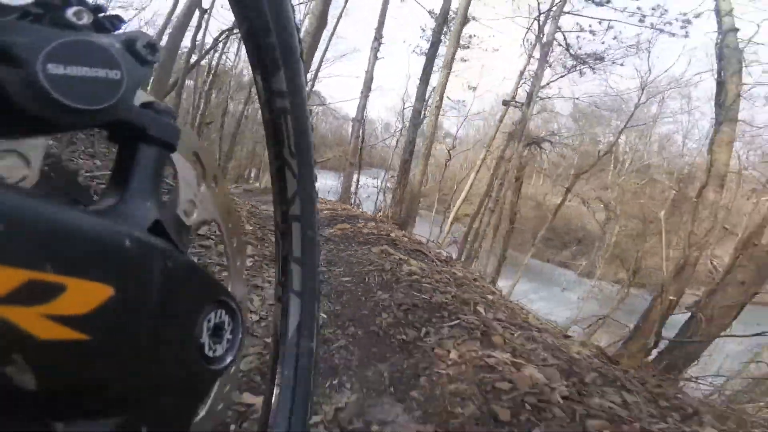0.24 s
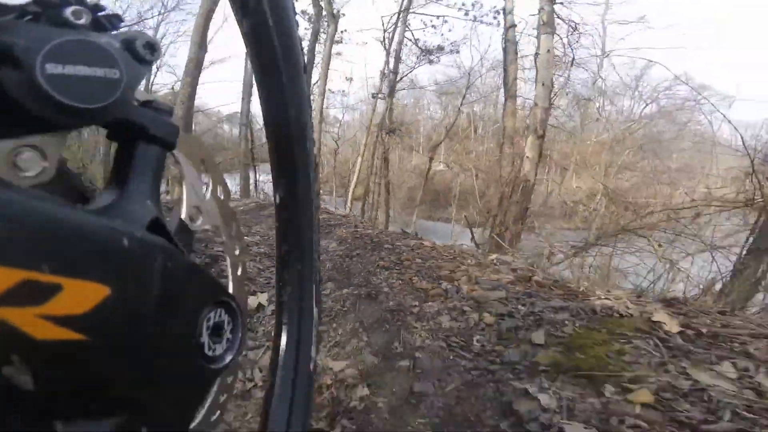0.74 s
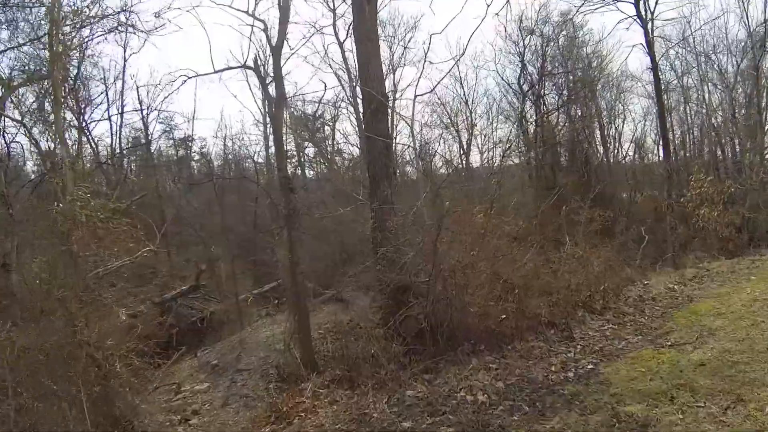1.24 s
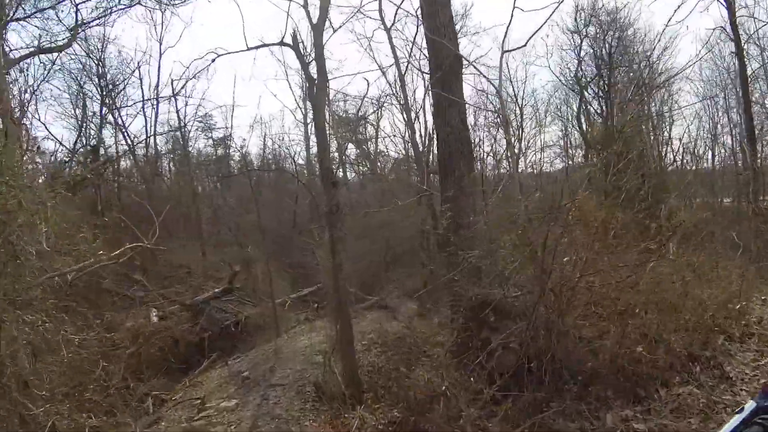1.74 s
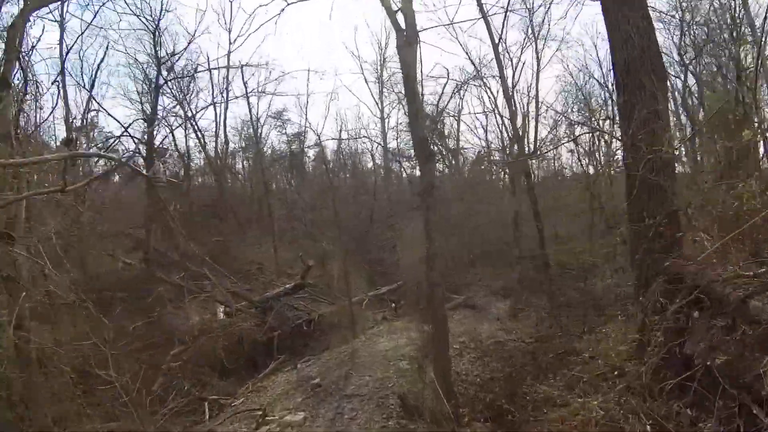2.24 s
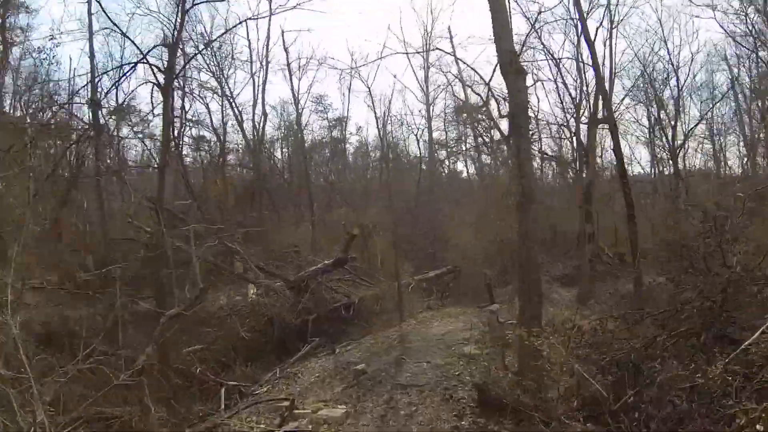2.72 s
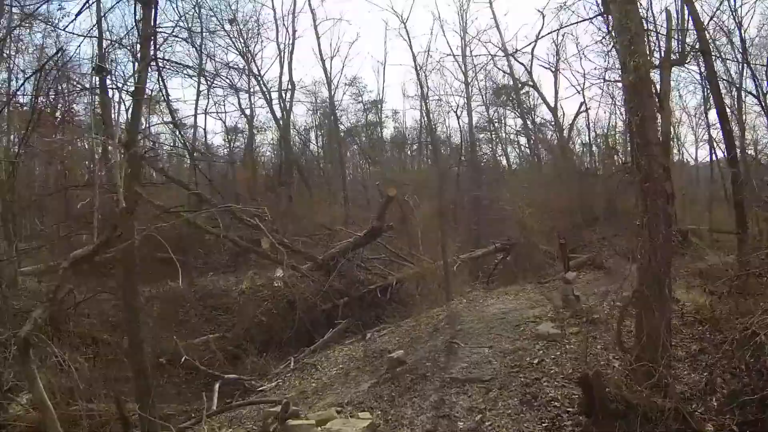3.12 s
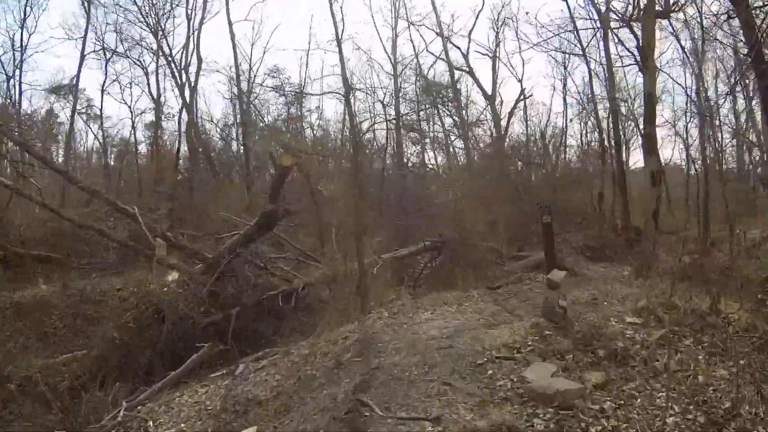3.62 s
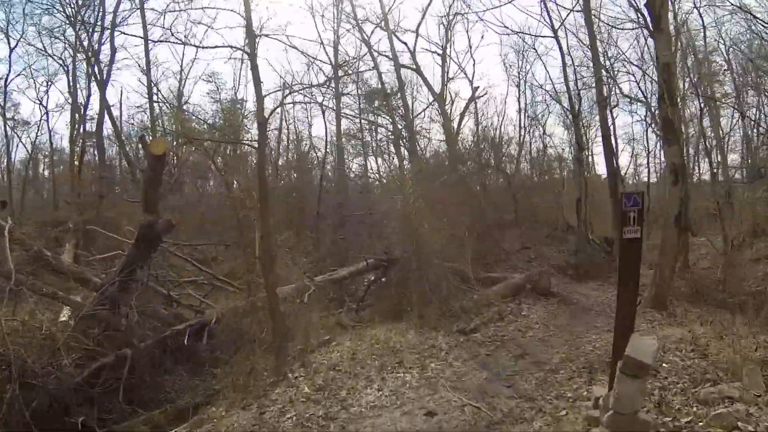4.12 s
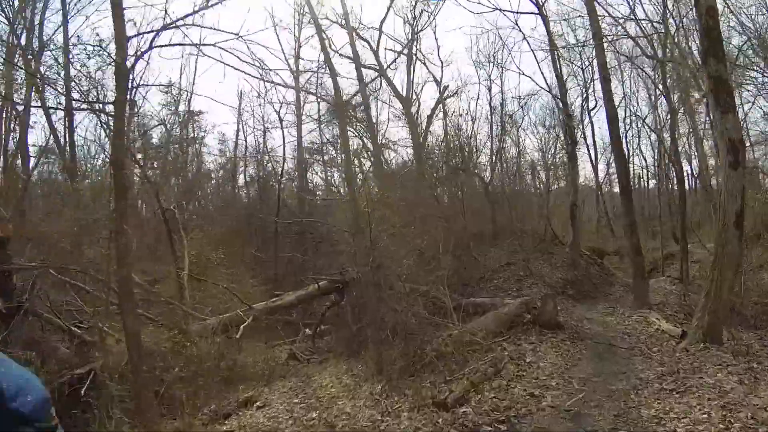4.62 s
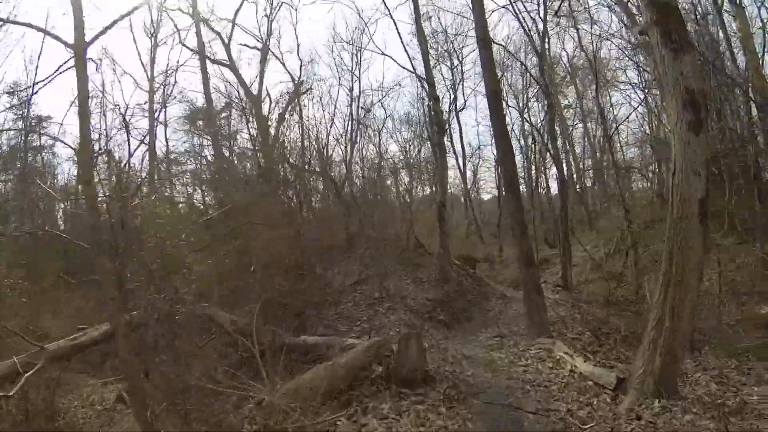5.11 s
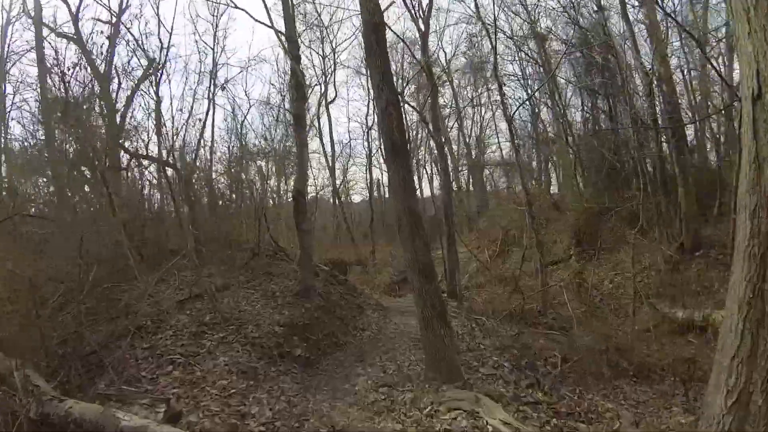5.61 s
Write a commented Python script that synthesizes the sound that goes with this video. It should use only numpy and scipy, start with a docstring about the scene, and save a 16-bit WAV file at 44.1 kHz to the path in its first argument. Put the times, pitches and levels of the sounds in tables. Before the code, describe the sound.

A mountain bike shakes over a dirt trail, heard from a closed case on its fork: booming tyre and frame, gritty rattles and sharp knocks that ring the brake disc. After about a second the sound cuts to a microphone on the rider, quieter at first. Wind rumble builds as tyres crunch leaves, twigs snap and bumps thud. The freewheel ticks while the bike coasts, the tyres hum briefly, and everything eases near the end.

```python
"""A mountain bike on a leafy dirt trail, heard first from a camera in a closed case on the fork:
the mount shakes, tyre and frame boom, grit rattles, and roots knock the parts and ring the brake disc.
At 1.2 s the sound cuts to a camera on the rider. Wind buffets the microphone, the body thrums, tyres
crunch leaves, twigs snap and bumps thud. From about 2 to 5 s the freewheel ticks as the bike coasts,
and around 3 s the tyre knobs hum briefly on hard ground, ending in a ringing bump."""
import sys
import numpy as np
from scipy import signal
from scipy.fft import rfft, irfft
from scipy.io import wavfile
from scipy.ndimage import uniform_filter1d

SR = 44100
rng = np.random.default_rng(int(sys.argv[2]) if len(sys.argv) > 2 else 0)


def digitize_waveform(pressure):
    """Quantize a signal to 16-bit integers and store it at the path in sys.argv[1].

    Rows of a 2-D input are taken as channels; values are limited to [-1, 1].
    """
    field = np.atleast_2d(pressure).T
    bounded = np.clip(field, -1, 1)
    quanta = np.round(bounded * 32767).astype(np.int16)
    wavfile.write(sys.argv[1], SR, quanta)


N = 258426
T = np.arange(N) / SR

# Table levels are relative. A mode is a note that a part rings at; t60 is its time to fade by 60 dB. Knocks
# over roots: t/s, crack/dB, boom/dB, rim/dB, treble/dB, disc/dB, pitch factor of the boom notes, boost of the
# top boom note/dB, pad/dB
KNOCKS = [(0.074, -34, -20, -50, -26, -44, 1.01, -2, -31),
          (0.192, -18, -15, -37, -46, -37.5, 0.99, -0.5, -40),
          (0.31, -28.5, -17.5, -40, -19.5, -39, 1.01, -4, -40),
          (0.39, -25, -28, -28, -39, -50, 1.01, 1, -42), (0.398, -26, -21, -21, -16.5, -50, 0.83, 3, -42),
          (0.429, -14, -15, -20, -39, -40, 1.01, 2, -42),
          (0.446, -41, -13.5, -10.5, -40, -53, 1.01, 0.5, -40),
          (0.457, -43, -19, -30, -24, -48, 1.03, -7, -40), (0.535, -4, -9, -8, -36, -55, 1.014, -1, -15),
          (0.554, -44, -11.5, -23, -11.5, -27, 1.02, 5.5, -22),
          (0.644, -5, -10.5, -10.5, -6.5, -30.5, .96, 4.5, -33),
          (0.659, -21.5, -7.5, -22, -23, -35, 0.98, 0, -35),
          (0.794, -19, -32, -21.5, -59, -56, 1.01, -6, -50),
          (0.814, -55, -13, -45, -60, -62, 1.01, -8, -59),
          (0.826, -33, -16.5, -42, -55, -53, 1.104, -4, -39),
          (0.93, -32.5, -35, -32, -53, -62, 1.24, 4, -47), (0.957, -38, -36, -40, -30, -60, 1.01, 6, -20.5),
          (1.032, -43, -37, -32, -54, -68, 1.4, 3, -55), (1.108, -70, -45, -33, -37, -65, 1.01, -5, -39),
          (1.173, -51.5, -32, -43, -33, -57, 1.01, 8, -44)]
# Modes of fork and wheel: f/Hz, level/dB, t60/s
FRAME_MODES = [(175.2, 4.5, 0.16), (209, -5.5, 0.17), (263.5, 4.5, 0.11), (431, -5.5, 0.043),
               (503, -5, 0.22), (1246, -9, 0.011), (1605, -13.5, 0.014), (1900, -13, 0.019)]
BOOM_MODES, RIM_MODES, CLACK_MODES = FRAME_MODES[:3], FRAME_MODES[3:5], FRAME_MODES[5:8]
# Modes of the brake pad grazing the disc: f/Hz, level/dB, t60/s
PAD_MODES = [(6490, -11.5, 0.016), (6900, -20, 0.015)]
# What the closed case lets through: f/Hz, level/dB
CASE_TONE = [(600, -1), (760, -8.5), (1000, -8), (1210, 0.5), (1680, -11), (1940, -7), (2590, -17),
             (4110, -20.5), (5420, -11.5), (6500, -16), (7500, -25), (9550, -30.5), (11300, -36.5),
             (12300, -52), (14000, -73)]
# What the rider's body passes on: f/Hz, level/dB
BODY_TONE = [(70, -39.5), (120, -2.5), (210, -7), (258, 2), (333, -6.5), (430, -12), (530, -16), (620, -20),
             (750, -19.5), (1100, -48)]
# The tone of crushed leaves: f/Hz, level/dB
LEAF_TONE = [(1290, -15), (2200, 2.5), (2500, 0.5), (3000, 5), (3690, 5.5), (4300, 4), (5500, 6.5),
             (6480, 3.5), (7510, -6), (9140, 1), (9920, -4.5), (12900, -7.5), (13900, -6.5), (15600, -37)]


def undb(db):
    """Turn decibels into a gain."""
    return 10 ** (np.asarray(db) / 20)


def unit(x):
    """Scale to an average (rms) level of 1."""
    return x / np.sqrt(np.mean(x ** 2))


def add(out, at, x):
    """Mix x into out, starting `at` seconds in."""
    i = int(at * SR)
    out[i:i + len(x)] += x[:N - i]


def colour(x, tone):
    """Filter x to the shape of a tone curve (f/Hz, level/dB); white noise keeps its power."""
    size = 1 << 13
    hz, db = np.transpose(tone)
    log_gain = np.interp(np.log(np.fft.rfftfreq(size, 1 / SR) + 1), np.log(hz), db) * np.log(10) / 20
    cepstrum = irfft(log_gain)
    # folding the second half onto the first keeps the filter from sounding before its input
    cepstrum[1:size // 2] *= 2
    cepstrum[size // 2 + 1:] = 0
    response = irfft(np.exp(rfft(cepstrum)))
    return signal.fftconvolve(x, response / np.linalg.norm(response))[:N]


def ring(x, modes):
    """Let x shake a part that rings at these modes (f/Hz, level/dB, t60/s)."""
    out = 0
    for hz, db, t60 in modes:
        pole = np.exp(2j * np.pi * hz / SR - np.log(1000) / (t60 * SR))
        out = out + undb(db) * np.sqrt(1 - abs(pole) ** 2) * signal.lfilter([1], [1, -pole], x).imag
    return out


def wander(per_s):
    """A curve that glides to a new random value per_s times a second."""
    step = int(SR / per_s)
    held = np.repeat(rng.standard_normal(N // step + 1), step)
    return unit(uniform_filter1d(held, step)[:N])


def grains(scatter_db, flutter_db, bunches_per_s):
    """Rough noise: tiny clicks of uneven size that come in bunches."""
    sizes = np.minimum(rng.exponential(size=N), 7)
    return unit(undb(scatter_db * sizes + flutter_db * wander(bunches_per_s)) * rng.standard_normal(N))


def strikes(times, db):
    """One sharp click at each time."""
    out = np.zeros(N)
    np.add.at(out, (np.asarray(times) * SR).astype(int), undb(db))
    return out


def bursts(times, db, t60, rise_s=0.00018):
    """Noise that rises fast and dies away at each time."""
    fades = signal.lfilter([1], [1, -np.exp(-np.log(1000) / (t60 * SR))], strikes(times, db))
    return uniform_filter1d(fades, size=max(int(rise_s * SR), 1)) * rng.standard_normal(N)


def band_click(x, low_hz, high_hz):
    """Keep one band of a short noise and scale its peak to 1."""
    click = signal.sosfilt(signal.butter(2, [low_hz, high_hz], "band", fs=SR, output="sos"), x)
    return click / np.abs(click).max()


def gain_curves(table):
    """Turn rows of a time and several levels into one gain curve per level column."""
    times, *columns = np.transpose(table)
    return [undb(np.interp(T, times, db)) for db in columns]


def gain_steps(table):
    """A gain that shifts by each row's level between its two times."""
    steps_db = sum(np.where((T > start) & (T < end), db, 0.) for start, end, db in table)
    return undb(uniform_filter1d(steps_db, size=90))


def fork_rumble(shake, boom, top_note, rim):
    """Rough ground rocks the camera and keeps fork and wheel ringing."""
    # The camera rocking on its clamp: f/Hz, level/dB, t60/s
    mount_modes = [(52.5, 12.5, 0.45), (33, -5, .15), (84, -12, 0.049)]
    lower, top = BOOM_MODES[:2], BOOM_MODES[2:]
    out = shake * unit(ring(grains(1.0, 1.0, 5.8), mount_modes))
    out += boom * undb(3.5) * unit(ring(grains(2.5, 4.2, 39.9), lower))
    out += top_note * unit(ring(ring(grains(1.1, 1.5, 24), top), top))
    return out + rim * unit(ring(grains(2, 1.5, 40), RIM_MODES))


def grit(gain):
    """Grit is heard through the case and also rings the frame and the brake pad."""
    dirt = gain * grains(3.35, 2.5, 60.3)
    return undb(0.5) * colour(dirt, CASE_TONE) + undb(-25) * ring(dirt, CLACK_MODES) + ring(dirt, PAD_MODES)


def knock_thumps():
    """Each root rings the rim, and its push of about a millisecond starts the low boom."""
    times, _, boom_db, rim_db, _, _, pitches, boosts_db, _ = np.transpose(KNOCKS)
    out = ring(strikes(times, rim_db + 28.5), RIM_MODES)
    push = np.r_[np.ones(40) / 40, np.zeros(SR // 2)]
    for at, db, pitch, boost_db in zip(times, boom_db, pitches, boosts_db):
        modes = np.array(BOOM_MODES) * [pitch, 1, 1]
        modes += [[0, 0.0072, 0.016], [0, 0, 0], [0, boost_db, 0.0046]]
        add(out, at, undb(db + 21) * ring(push, modes))
    return out


def knock_clatter():
    """Parts hit each other: a crack through case and frame, a bright tick and a ringing pad."""
    times, crack_db, _, _, treble_db, _, _, _, pad_db = np.transpose(KNOCKS)
    crack = bursts(times, crack_db, t60=0.038)
    treble_tone = [(1800, -70)] + CASE_TONE[6:]
    out = undb(-3.5) * colour(crack, CASE_TONE) + undb(3.5) * ring(crack, CLACK_MODES)
    out += undb(-13.5) * colour(bursts(times, treble_db, t60=0.042), treble_tone)
    return out + undb(5) * ring(bursts(times, pad_db, t60=0.034), PAD_MODES)


def brake_disc():
    """Each knock rings the brake disc like a small bell."""
    # Modes of the disc: f/Hz, level/dB, t60/s
    disc_modes = [(2083, 4, .2), (2690, -9, .13), (3180, -6, .2), (3620, -16, .22), (3845, -15, .28),
                  (4410, -17, .16), (4985, -9, .38), (5478, -1, .4), (5492, -8, .4), (6780, -12, .15)]
    times, _, _, _, _, disc_db, *_ = np.transpose(KNOCKS)
    return ring(strikes(times, disc_db + 21), disc_modes)


def fork_camera(muffle_hz=10900):
    """Everything heard on the fork, with the highest treble muffled by the case."""
    # Rolling strength: t/s, mount shake/dB, tyre boom/dB, top boom note/dB, rim/dB, grit/dB
    rolling_levels = [(0.0, -24, -33, -25, -42, -38), (0.12, -11.5, -19, -26, -39, -40.5),
                      (0.216, -17, -29.5, -25, -41.5, -39.5), (0.326, -17, -28.5, -28.5, -41, -44),
                      (0.41, -26, -28, -28, -42, -38), (0.455, -26, -21, -29, -24, -37),
                      (0.5, -21, -22, -23, -32, -42), (0.56, -15, -27, -21, -32, -43),
                      (0.63, -32, -30, -35, -35, -38), (0.7, -32, -23.5, -32, -33, -41),
                      (0.78, -28, -34, -36, -48, -46), (0.834, -30, -28, -29, -43, -43),
                      (0.89, -38, -30, -34, -33, -47), (0.928, -42, -38, -30, -34, -45),
                      (0.988, -27, -41, -22.5, -42, -47), (1.03, -25, -37, -36.5, -44, -48.5),
                      (1.08, -24.5, -36, -35.5, -33, -51), (1.158, -21, -36, -41, -43, -47),
                      (1.2, -33, -34, -30.5, -43, -48)]
    # The level dips just before the two hardest knocks: start/s, end/s, change/dB
    level_dips = [(.486, .534, -11), (.612, .643, -9)]
    shake, boom, top_note, rim, dirt = gain_curves(rolling_levels)
    bike = fork_rumble(shake, boom, top_note, rim) + grit(dirt) + knock_thumps() + knock_clatter()
    muffle = signal.butter(6, muffle_hz, fs=SR, output="sos")
    return signal.sosfilt(muffle, gain_steps(level_dips) * bike + brake_disc())


def wind():
    """Air buffets the microphone opening and makes a deep rumble."""
    # The tone of the buffeting: f/Hz, level/dB
    wind_tone = [(8.8, -42.5), (15, 4), (38, 1), (151, -11.5), (200, -13.5), (260, -35), (440, -120)]
    return unit(colour(grains(0.81, 1.86, 25), wind_tone))


def body_thrum():
    """The shaking of the trail travels up through the rider's body."""
    return undb(-1) * unit(colour(grains(2.46, 2.93, 40), BODY_TONE))


def tyre_roll():
    """Tyres crush the ground with a grainy, mid-pitched noise."""
    # The tone of rolling tyres: f/Hz, level/dB
    roll_tone = [(260, -16.5), (450, 3), (679, -6.5), (800, -3), (1950, -2), (2480, -8), (3500, -11),
                 (4550, -39), (7700, -120)]
    return undb(1.5) * unit(colour(grains(3.45, 1.83, 70), roll_tone))


def leaf_crunch():
    """Many leaves are crushed at once; the lower and upper treble flicker separately."""
    lower_tone = LEAF_TONE[:9] + [(16000, -60)]
    upper_tone = [(6500, -69)] + LEAF_TONE[8:] + [(16000, -60)]
    lower = undb(1.2) * unit(colour(grains(2.2, 1.5, 90), lower_tone))
    return lower + undb(-6.5) * unit(colour(grains(2.2, 1.5, 90), upper_tone))


def leaf_crackles(per_s=90, fade_s=0.002):
    """Single leaves crack at random moments, each at its own pitch."""
    out = np.zeros(N)
    t = np.arange(512) / SR
    for when, pitch, size in rng.random((int(per_s * N / SR), 3)):
        crack = rng.standard_normal(len(t)) * np.exp(-t / fade_s)
        hz = 1800 * 3.6 ** pitch
        db = 2 - 3 * np.log(1 - 0.95 * size)  # most are quiet, a few are loud
        add(out, when * N / SR, undb(db) * band_click(crack, hz / 1.22, hz * 1.17))
    return out


def twig_snaps(fade_s=0.0052):
    """A twig breaks with one sharp crack, then splinters and a leafy hiss."""
    # Snapping twigs and leaves: t/s, level/dB, f/Hz, hiss/dB
    snaps = [(1.276, -37, 3300, -65), (1.297, -36.5, 1510, -54), (1.308, -32, 5900, -50),
             (1.322, -38, 5200, -56), (1.521, -41, 1800, -54), (1.529, -41, 1400, -52),
             (1.611, -27.5, 1210, -51), (1.631, -46, 5000, -61), (1.659, -47, 5300, -65),
             (1.677, -40, 4000, -65), (1.709, -36.5, 834, -65), (1.796, -34, 1680, -49),
             (1.904, -32.5, 1870, -65), (1.97, -26, 1720, -64), (1.982, -36, 1500, -66),
             (2.356, -28, 1900, -51), (2.372, -26.5, 1520, -52), (2.549, -29, 1470, -41),
             (2.563, -22.5, 1310, -47), (2.62, -23, 1420, -54), (2.667, -24.5, 1500, -36),
             (2.678, -26, 1110, -43), (2.796, -23.5, 2190, -48), (2.868, -26, 1640, -55),
             (3.048, -26, 1070, -39), (3.102, -22.5, 743, -31.5), (3.131, -18.5, 1840, -31.5),
             (3.245, -20.5, 1415, -48), (3.293, -26, 1600, -50), (3.362, -21, 830, -40),
             (3.386, -15, 2330, -26), (3.804, -15.5, 970, -30.5), (3.875, -21, 3720, -45),
             (3.922, -29, 1100, -51), (4.052, -29, 1500, -50), (4.088, -25.5, 2060, -53),
             (4.152, -33, 5000, -38), (4.188, -18, 720, -35.5), (4.313, -28.5, 1500, -36.5),
             (4.444, -22.5, 1560, -42), (4.617, -29, 1430, -49), (4.851, -27, 1220, -38),
             (4.913, -26.5, 1350, -60), (4.935, -21.5, 1640, -46), (5.119, -40, 799, -39),
             (5.159, -29.5, 2260, -60), (5.236, -17.5, 2460, -41), (5.484, -34.5, 1700, -62),
             (5.699, -30, 3300, -57), (5.791, -29, 4500, -46)]
    out = np.zeros(N)
    for at, db, hz, _ in snaps:
        twig = rng.standard_normal(2048) * np.exp(-np.arange(2048) / (fade_s * SR))
        twig[0] = 4  # the first crack stands above the splinters
        add(out, at, undb(db - 1) * band_click(twig, hz / 1.61, hz * 1.46))
    times, _, _, hiss_db = np.transpose(snaps)
    return out + colour(bursts(times, hiss_db, t60=0.098, rise_s=0.0018), LEAF_TONE)


def body_thuds(width_cycles=0.92):
    """A bump gives the body one soft swing and leaves it shaking briefly."""
    # Bumps heard through the body: t/s, level/dB, f/Hz
    thuds = [(1.605, -31.5, 262), (1.702, -39, 205), (1.922, -35, 90), (2.698, -20, 94), (2.74, -14.5, 210),
             (2.832, -15, 145), (2.959, -41, 254), (3.086, -28, 181), (3.113, -15, 171), (3.277, -20, 189),
             (3.555, -14, 119), (3.69, -22, 173), (3.807, -13, 169), (3.82, -18, 171), (3.853, -26, 127),
             (3.937, -19, 102), (4.05, -16.5, 253), (4.088, -23, 260), (4.171, -15.5, 143),
             (4.188, -16.5, 200), (4.228, -15, 127), (4.303, -22.5, 130), (4.333, -27, 150),
             (4.399, -14.5, 187), (4.489, -19, 142), (4.505, -20.5, 153), (4.607, -27, 170),
             (4.689, -27.5, 60), (4.89, -31, 114), (5.314, -33.5, 255), (5.773, -34, 107)]
    out = np.zeros(N)
    for at, db, hz in thuds:
        cycles = np.arange(int(3 * width_cycles / hz * SR)) * hz / SR - 1.47 * width_cycles
        swing = -np.sin(2 * np.pi * cycles) * np.exp(-(2 * cycles / width_cycles) ** 2)
        add(out, at - 0.002, undb(db + 3.5) * swing)
    times, thud_db, _ = np.transpose(thuds)
    return out + colour(bursts(times, thud_db - 7, t60=0.054, rise_s=0.0024), BODY_TONE)


def leaf_scrapes():
    """Dry leaves dragged under the tyre hiss with a sliding pitch."""
    # Dragged leaves: t/s, length/s, start f/Hz, end f/Hz, bandwidth/Hz, level/dB
    scrapes = [(1.837, 0.058, 5200, 5900, 900, -47), (3.545, .09, 5700, 4900, 900, -40),
               (3.698, .06, 5600, 5200, 1200, -45), (3.78, 0.034, 5200, 6440, 900, -41),
               (3.884, .04, 4300, 2880, 900, -34)]
    out = np.zeros(N)
    for at, length_s, start_hz, end_hz, width_hz, db in scrapes:
        n = int(length_s * SR)
        roughness = unit(uniform_filter1d(rng.standard_normal(8192)[:n], size=int(SR / width_hz)))
        slide = np.sin(2 * np.pi * np.cumsum(np.linspace(start_hz, end_hz, n)) / SR)
        add(out, at, undb(db) * np.sqrt(np.hanning(n)) * roughness * slide)
    return out


def freewheel(jitter_s=0.0006, scatter_db=2.2, t60=0.05):
    """A small catch (the pawl) drops off each passing tooth, rings the hub and hisses briefly."""
    # How far the freewheel has turned: t/s, teeth passed
    turning = [(1.914, 0), (1.972, 2), (2.066, 6), (2.144, 9), (2.228, 12), (2.322, 15), (2.408, 18),
               (2.509, 22), (2.592, 25), (2.718, 30), (2.764, 32), (2.828, 34), (2.925, 38), (3.006, 41),
               (3.123, 46), (3.903, 76), (4.114, 84), (4.224, 87), (4.286, 89), (4.415, 94), (4.635, 104),
               (4.722, 108), (4.799, 111), (4.857, 113), (4.973, 116), (5.031, 117)]
    # Strength of the ticks: t/s, level/dB
    tick_levels = [(1.9, -34), (2.2, -32.5), (2.6, -27), (2.9, -30), (3.3, -29.5), (4.1, -32.5),
                   (4.45, -34.5), (4.75, -31.5), (5.03, -34)]
    # Modes of the hub shell: f/Hz, level/dB, t60/s
    hub_modes = [(4400, -7, .012), (5300, -1, .016), (6100, -5, .012), (9300, -10, .012), (10400, -6, .016),
                 (11150, -5, .016), (12600, -6, .016), (13600, -11, .012)]
    # The tone of a tick's hiss: f/Hz, level/dB
    hiss_tone = [(2060, -25), (3500, -13), (3730, 2), (4250, -9), (4600, -1), (5290, 0), (6220, -1),
                 (7500, -18), (9160, -8.5), (11300, -7), (13600, -12), (15600, -25)]
    at, teeth = np.transpose(turning)
    times = np.interp(np.arange(teeth[-1] + 1), teeth, at)
    times += jitter_s * rng.standard_normal(len(times))
    db = np.interp(times, *np.transpose(tick_levels)) + scatter_db * rng.standard_normal(len(times))
    hub = ring(bursts(times, db - 13, t60, rise_s=0.0014), hub_modes)
    return hub + colour(bursts(times, db - 9.5, t60, rise_s=0.00059), hiss_tone)


def tread_hum_and_bump():
    """Tyre knobs hum on hard ground, then a bump rings; the note and its octave throb separately."""
    # The hum of the knobs, ending in a bump that rings near 260 Hz: t/s, f/Hz, level/dB, octave/dB
    hum_and_bump = [(2.76, 231.8, -28.5, -45.5), (2.95, 254.5, -28, -39), (3.12, 283.2, -29, -37.5),
                    (3.3, 300.4, -30.5, -39.5), (3.38, 262.4, -40, -35), (3.428, 265.6, -15, -25.5),
                    (3.48, 262, -34, -42)]
    times, hz, db, octave_db = np.transpose(hum_and_bump)
    wavering_hz = np.interp(T, times, hz) * (1 + 0.06165 * wander(70))
    phase = 2 * np.pi * np.cumsum(wavering_hz) / SR
    note = undb(np.interp(T, times, db) - 0.5 + 3.4 * wander(50)) * np.sin(phase)
    note += undb(np.interp(T, times, octave_db) - 1.5 + 4.4 * wander(60)) * np.sin(2 * phase)
    fade = np.clip(np.minimum(T - times[0], times[-1] - T) / 0.03, 0, 1)
    return note * fade


def rider_camera(gust_db=2.5, gusts_per_s=14):
    """Everything heard on the rider: wind and thrum swell together, as do tyre roll and crunch."""
    # Strength of the steady sounds: t/s, wind/dB, body thrum/dB, tyre roll/dB, leaf crunch/dB
    ride_levels = [(1.21, -42, -59, -59, -58), (1.53, -44, -52, -56.5, -61.5),
                   (1.77, -42, -46.5, -55.5, -63), (1.81, -36, -52.5, -55, -53.5),
                   (2.12, -33, -41, -49.5, -53.5), (2.6, -27.5, -35.5, -43.5, -47.5),
                   (2.75, -19.5, -28, -42, -46.5), (2.9, -21.5, -30.5, -39.5, -44),
                   (3.14, -23, -30.5, -40.5, -45), (3.42, -23, -24, -36.5, -42.5),
                   (3.57, -17.5, -30.5, -44, -38), (3.66, -22.5, -28.5, -45.5, -40),
                   (3.75, -17, -27.5, -43.5, -39), (3.98, -22, -34, -46, -43.5),
                   (4.13, -31.5, -34, -43.5, -45), (4.25, -27, -42, -45, -47),
                   (4.55, -27.5, -43.5, -45.5, -47.5), (4.95, -33, -37.5, -53, -47.5),
                   (5.12, -38, -45, -48, -49), (5.54, -39.5, -46.5, -52.5, -51),
                   (5.86, -33.5, -45, -52.5, -45)]
    # Brief swells and dips in the level of tyre roll and crunch: start/s, end/s, change/dB
    crunch_swells_and_dips = [(1.3, 1.335, 1), (1.515, 1.55, 2), (4.12, 4.15, -5.5), (4.87, 4.893, -2),
                              (5.165, 5.2, -3), (5.49, 5.54, -3.5), (5.63, 5.67, -5)]
    air, thrum, roll, crunch = gain_curves(ride_levels)
    gusts = undb(gust_db * wander(gusts_per_s))
    out = tread_hum_and_bump() + crunch * leaf_crackles() + leaf_scrapes()
    out += gusts * (air * wind() + thrum * body_thrum())
    flicker = gain_steps(crunch_swells_and_dips) * undb(0.73 * wander(45) + 1.2 * wander(6))
    out += flicker * (roll * tyre_roll() + crunch * leaf_crunch())
    return out + body_thuds() + twig_snaps() + freewheel()


def scene(cut_s=1.2):
    """One channel that cuts straight from the fork camera to the rider's camera."""
    return np.where(T < cut_s, fork_camera(), rider_camera())[None]


def record(dry):
    """Round off the loudest peaks and remove the treble above 15100 Hz."""
    rounded = np.tanh(0.79 * dry) / 0.99
    return signal.sosfilt(signal.ellip(8, 0.2, 70, 15100, fs=SR, output="sos"), rounded)


dry = scene()
out = record(dry)
digitize_waveform(out)
```